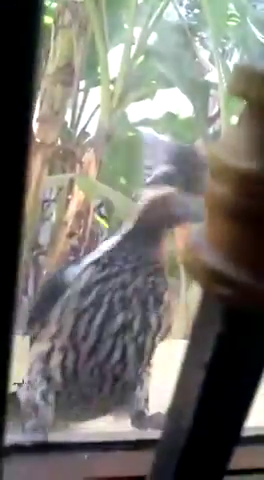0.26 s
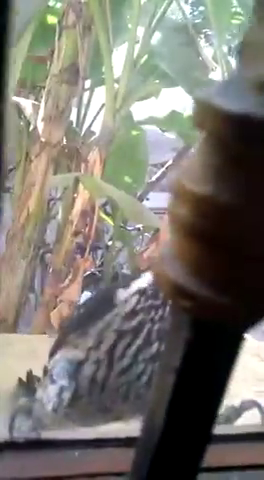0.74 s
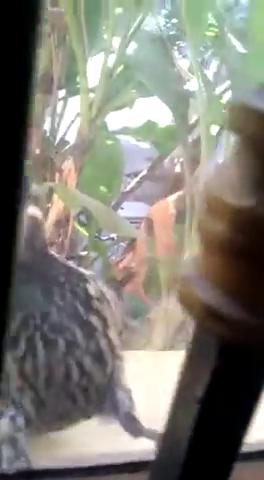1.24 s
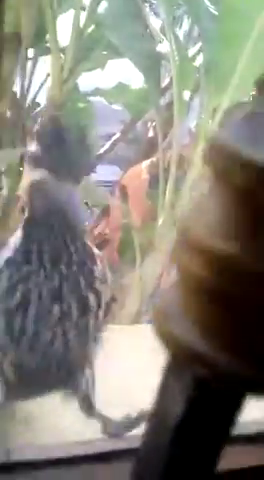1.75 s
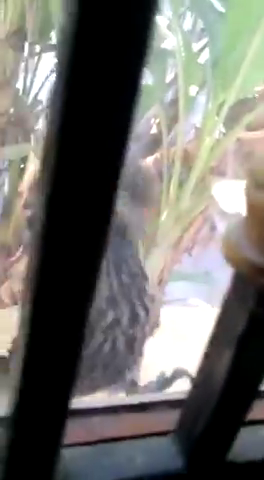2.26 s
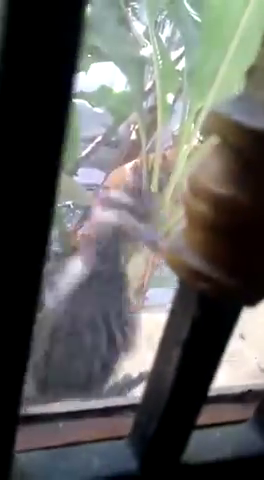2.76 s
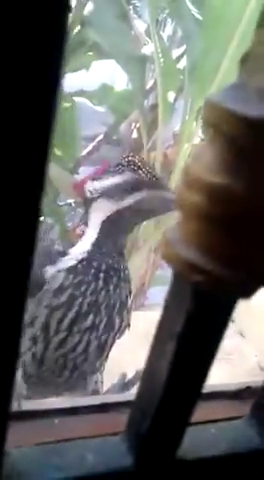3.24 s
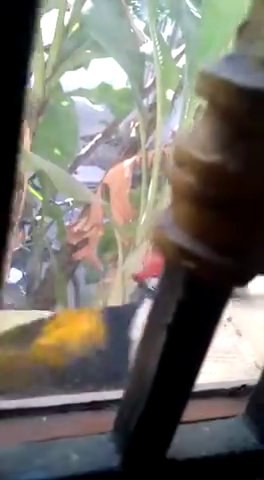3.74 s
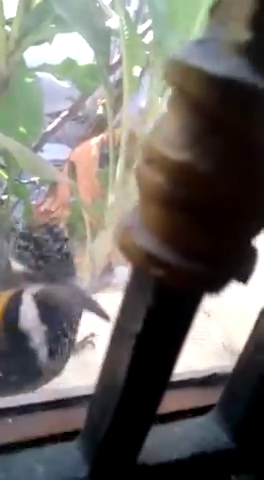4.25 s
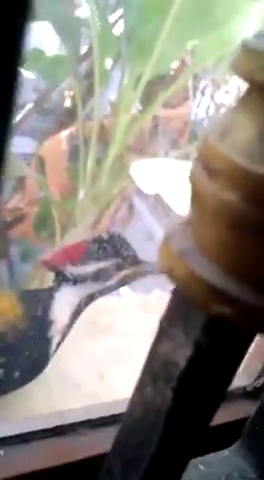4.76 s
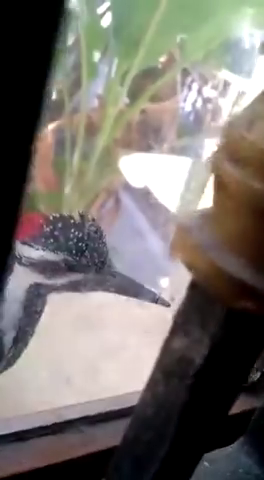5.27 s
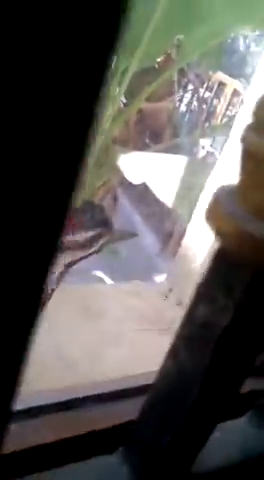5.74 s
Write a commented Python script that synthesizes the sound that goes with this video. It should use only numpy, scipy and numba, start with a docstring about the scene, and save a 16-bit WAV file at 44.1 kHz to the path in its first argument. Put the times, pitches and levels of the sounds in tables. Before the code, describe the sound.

Sharp hollow beak knocks strike a window over low steady air noise, with tiny scratches, soft handling bumps and one faint distant chirp.

```python
"""Woodpecker at the window

A woodpecker on the sill outside a closed window strikes the pane and frame: each blow is a push, a crack,
ringing tones and a noisy rattle. Its claws and feathers scrape in short grainy hisses.
Indoors a phone hears a dull rush of air, made of noise bands, and low bumps from its own handling. A far bird
gives one faint note. Strong blows clip, and the gain control ducks the rush, then lets it swell back.
"""
import sys
import numpy as np
from scipy import signal
from scipy.fft import rfft, irfft
from scipy.io import wavfile
from scipy.ndimage import uniform_filter1d
from numba import njit

SR = 44100
rng = np.random.default_rng(int(sys.argv[2]) if len(sys.argv) > 2 else 0)


def waveform_to_disk(signal):
    """Save audio, clipped to [-1, 1], as 16-bit WAV at the path in sys.argv[1]."""
    frames = np.transpose(np.atleast_2d(signal))
    scaled = np.clip(frames, -1, 1) * 32767
    samples = np.round(scaled).astype(np.int16)
    wavfile.write(sys.argv[1], SR, samples)


N = 264600  # samples, 6 s
HZ = np.arange(N // 2 + 1) * SR / N
TIME = np.arange(N) / SR


def undb(db):
    """Turn a level in dB into a plain gain."""
    return 10 ** (np.asarray(db) / 20)


def level(x, db):
    """Scale a sound to an rms (average) level in dB."""
    return x * undb(db) / np.sqrt(np.mean(x ** 2))


def colour(table):
    """Draw a gain for every frequency through (frequency [Hz], level [dB]) points."""
    hz, db = np.transpose(table)
    return undb(np.interp(np.log(HZ + 1), np.log(hz), db))


def band(hz, octaves, size=N):
    """Make noise in a bell-shaped band around one frequency, rms 1."""
    f = np.arange(size // 2 + 1) * SR / size
    bell = np.exp(-(np.log2((f + 1) / hz) / octaves) ** 2)
    noise = rfft(rng.standard_normal(size))
    return level(irfft(noise * bell, size), 0)


def walk(rate):
    """Wander at random: a new value `rate` times a second, smoothed twice; spread near 1."""
    k = int(SR / rate)
    steps = np.repeat(rng.standard_normal(N // k + 1), k)
    smooth = uniform_filter1d(uniform_filter1d(steps, k), k)
    return 1.14 * smooth[:N]


def add(out, s, sound):
    """Mix a sound in from second s."""
    i = int(s * SR)
    out[i:i + len(sound)] += sound[:N - i]


def fade(t, t60):
    """Die away by 60 dB in t60 seconds."""
    return np.exp(-np.log(1000) * t / t60)


# beak blows: (time [s], strength [dB], contact [ms], brightness [dB], push on the pane [dB])
BEAK_BLOWS = [(1.6126, -4.5, 1.07, 6, -1), (1.6282, -2.5, 0.88, 1, 5), (2.1293, -3.5, 0.92, 6, 1),
              (2.1488, 7, 1.4, 1.5, 4), (2.1734, -9, 0.97, 1, 0.5), (2.7618, 10, 1.38, 3.5, 4)]
# ringing tones of pane and frame: (frequency [Hz], relative level [dB], time to fall 60 dB [s])
WINDOW_MODES = [(189.4, -10.5, 0.35), (368, -6.5, 0.057), (432, -1.5, 0.073), (560, -6, 0.046),
                (703, -2.5, 0.013), (797, -15, 0.044), (922, -10.5, 0.03), (1100, -15.5, 0.034),
                (1310, -9, 0.01), (1620, -12, 0.023), (2810, -34, 0.11), (3480, -32, 0.032),
                (5720, -32, 0.038), (7500, -25, 0.022)]
# hard beak tip on glass, noise bands: (frequency [Hz], relative level [dB])
TIP_CRACK = [(3300, -28.5), (5700, -31), (7800, -34.5), (11000, -45)]
# rattle of the loose pane and the room's answer: (frequency [Hz], relative level [dB], time to fall 60 dB [s])
PANE_RATTLE = [(418, -23.5, 0.27), (950, -27, 0.21), (1790, -27, .15), (2840, -31.5, 0.24),
               (5430, -39.5, 0.38), (8100, -43, 0.29), (11500, -59, .14)]


def beak(ring_db=-3.0, spread_db=1.4, rise_ms=3.1, crack_t60=0.053, pane_hz=170, chatter_db=2.5):
    """Each blow pushes the pane, cracks, rings the window's own tones and sets off a rattle."""
    out, t = np.zeros(N), TIME[:SR // 2]
    for s, strength_db, contact_ms, bright_db, push_db in BEAK_BLOWS:
        push = np.sin(np.pi * np.clip(t * 1000 / contact_ms, 0, 1)) ** 2

        # every blow lands on another spot, so the balance of the tones shifts
        spot_db = spread_db * rng.standard_normal(len(WINDOW_MODES))
        ring = np.zeros(len(t))
        for (hz, db, t60), shift_db in zip(WINDOW_MODES, spot_db):
            # glancing, bright blows favour the tones from about 900 Hz up
            tilt_db = bright_db * np.clip(np.log2(hz / 650) * 2, -1, 1)
            ring += undb(db + shift_db + tilt_db) * np.sin(2 * np.pi * hz * t) * fade(t, t60)
        ring *= undb(ring_db) * (1 - np.exp(-t * 1000 / contact_ms))  # longer contact, slower build-up

        crack = sum(undb(db + bright_db) * band(hz, 0.46, size=len(t)) for hz, db in TIP_CRACK)
        crack = crack * fade(t, crack_t60)

        rattle = sum(undb(db) * band(hz, 0.57, size=len(t)) * fade(t, t60) for hz, db, t60 in PANE_RATTLE)
        chatter = undb(chatter_db * walk(224)[:len(t)])  # quick uneven flutter
        rattle = rattle * chatter * (1 - np.exp(-t * 1000 / rise_ms))

        add(out, s, undb(strength_db) * (crack + rattle - ring - undb(push_db) * push))
    # a small pane radiates little deep bass
    return signal.sosfilt(signal.butter(2, pane_hz, "high", fs=SR, output="sos"), out)


# claws and feathers on sill and glass: (time [s], level [dB], length [ms])
CLAW_SCRAPES = [(.541, -43, 16), (.565, -45, 16), (.8265, -39.5, 8), (.901, -42, 6), (.9164, -39, 6),
                (.942, -38, 3), (1.055, -43.5, 12), (1.092, -45, 10), (1.1134, -41, 8.8), (1.1274, -41, 6),
                (1.537, -39.5, 34), (1.5988, -41, 5), (1.656, -40, 14), (2.718, -46, 45), (3.648, -42, 4.5)]
# a flick this short or shorter hisses at FLICK_HZ; each doubling of length shifts the centre
FLICK_HZ, FLICK_MS, DRAG_OCTAVES = 10200, 6.5, -0.33


def claws(octaves=0.86, grain_db=1.8):
    """Grainy treble hisses start fast and fade over the length of the slip; long drags sound lower."""
    out, t = np.zeros(N), TIME[:SR // 8]
    for s, db, ms in CLAW_SCRAPES:
        hz = FLICK_HZ * max(ms / FLICK_MS, 1) ** DRAG_OCTAVES
        hiss = band(hz, octaves, size=len(t))
        # the level jumps every 40 samples, which gives the grain
        jumps = np.repeat(rng.standard_normal(len(t) // 40 + 1), 40)[:len(t)]
        shape = (1 - np.exp(-t / 0.00085)) * np.exp(-(t * 1000 / ms) ** 2)
        add(out, s, undb(db) * hiss * undb(grain_db * jumps) * shape)
    return out


# fingers shifting on the phone: (time [s], level [dB])
HAND_BUMPS = [(0.291, -21), (0.849, -36), (1.179, -26), (3.8, -21), (4.43, -28), (4.599, -30), (5.63, -24)]
BUMP_HZ, BUMP_CYCLES = 68, 2.5


def hand():
    """Soft low bumps through the phone's case: a few cycles of a deep tone that swell and fade."""
    out, t = np.zeros(N), TIME[:SR // 5]
    shape = np.sin(np.pi * np.clip(t * BUMP_HZ / BUMP_CYCLES, 0, 1)) ** 2
    bump = np.sin(2 * np.pi * BUMP_HZ * t) * shape
    for s, db in HAND_BUMPS:
        add(out, s, undb(db) * bump)
    return out


# tone colour of the rushing air: (frequency [Hz], relative level [dB])
AIR_COLOUR = [(40, -61.5), (90, -57.5), (170, -52), (250, -54.5), (310, -47), (450, -50), (700, -65),
              (1000, -65.5), (1270, -65), (1700, -69.5), (3000, -74), (5500, -88), (8000, -89),
              (11000, -97.5), (14000, -103.0)]
# how much of the air is unrelated left and right: (frequency [Hz], share [dB])
AIR_APART = [(30, -30), (60, -23), (300, -23), (2000, -38), (3000, -35), (5000, -8), (9000, -12),
             (13000, -17)]
# wavering low hums: (frequency [Hz], level [dB])
LOW_HUMS = [(95, -36.5), (148, -40.5), (200, -38)]
# slow swell of the air: (time [s], level [dB])
AIR_GUST = [(0, -0.5), (.9, 1.6), (1.5, -0.5), (4.3, 0), (6, -2)]
AIR_DB = -22.5  # rms level of the rush before the gust


def air(swell_db=-0.57, flicker_db=1.5, whine_hz=1255, whine_db=-45.5):
    """Half-octave steps of noise swell together and flicker alone, with wavering hums and a narrow whine."""
    swell = swell_db * walk(1.5)
    mid = np.zeros(N)
    for hz in 30 * 2 ** np.arange(0, 9.5, .5):
        # the far hiss on top flickers less than the roar below
        flicker = flicker_db * min(1, 1500 / hz) ** .5 * walk(8.3)
        mid += np.sqrt(hz) * band(hz, 0.4) * undb(swell + flicker)

    # extra noise, added on the left and subtracted on the right, widens the rush
    side = rfft(np.std(mid) * rng.standard_normal(N)) * colour(AIR_APART)
    both = irfft((rfft(mid) + np.array([side, -side])) * colour(AIR_COLOUR), N)

    hums = sum(level(band(hz, 0.059) * undb(3.5 * walk(2.92)), db) for hz, db in LOW_HUMS)
    whine = level(band(whine_hz, 0.041), whine_db)
    gust = undb(np.interp(TIME, *np.transpose(AIR_GUST)))
    return (level(both, AIR_DB) + hums + whine) * gust


CHIRP_S, CHIRP_HZ, CHIRP_MS, CHIRP_DB = 5.639, 3790, 45, -43  # middle of the note, pitch, length, level


def far_bird():
    """One faint thin note: a steady tone that swells and fades in a smooth bell shape."""
    shape = np.exp(-((TIME - CHIRP_S) * 2000 / CHIRP_MS) ** 2)
    return undb(CHIRP_DB) * shape * np.sin(2 * np.pi * CHIRP_HZ * TIME)


def scene():
    """All sounds together as they reach the phone, left and right."""
    return beak() + claws() + hand() + air() + far_bird()


@njit
def ride(x, start_db, top_db, slope, release_db, duck_s, swell_s):
    """Gain control that follows the loudest recent peak: it ducks fast and swells back slowly."""
    gain, held, g = np.empty(len(x)), top_db - start_db / slope, start_db
    for i in range(len(x)):
        # the remembered peak sinks by release_db each second
        held = max(held - release_db / SR, 20 * np.log10(x[i] + 1e-9))
        goal = min(0., slope * (top_db - held))
        g += (goal - g) / (SR * (duck_s if goal < g else swell_s))
        gain[i] = 10 ** (g / 20)
    return gain


# late inverted copy and bass of each microphone, left then right:
# (first notch [Hz], share of the copy [0-1], copy fades above [Hz], bass cut [Hz], bass lift [dB])
MIC_COMB = [(2374, .76, 6600, 90, 1.57), (2200, .78, 10000, 28, 0)]
# level of the left-right difference: (frequency [Hz], level [dB])
STEREO_WIDTH = [(60, 8.5), (650, -0.5), (900, -51), (3300, -16), (4000, -1.5), (10000, 3.5), (14000, -4)]
SHELF_HZ = 2000  # half of the bass lift, in dB, is left here
DIP_HZ, DIP_WIDTH_HZ, DIP_SHARE = 13200, 490, .6  # a dip in the microphones' top
TOP_HZ, CEILING = 14200, 0.97  # treble cut; clipping level (full scale is 1)


def record(dry):
    """Late inverted copies comb the microphones, mids go near mono, gain rides, peaks clip, the top is cut."""
    heard = []
    for x, (notch_hz, share, fade_hz, bass_hz, lift_db) in zip(dry, MIC_COMB):
        late = np.exp(-2j * np.pi * HZ / notch_hz)  # a delay of 1 / notch_hz seconds
        comb = 1 - share / (1 + (HZ / fade_hz) ** 2) * late
        lift = undb(lift_db / (1 + (HZ / SHELF_HZ) ** 2))
        bass_cut = 1j * HZ / (1j * HZ + bass_hz)
        heard.append(rfft(x) * comb * lift * bass_cut)
    left, right = heard

    mid = (left + right) / 2
    side = (left - right) / 2 * colour(STEREO_WIDTH)
    dip = 1 - DIP_SHARE * np.exp(-((HZ - DIP_HZ) / DIP_WIDTH_HZ) ** 2)
    sound = irfft([(mid + side) * dip, (mid - side) * dip], N)

    loudest = np.abs(sound).max(axis=0)  # both sides share one gain
    gain = ride(loudest, start_db=-8., top_db=-11.5, slope=0.65, release_db=24.0, duck_s=0.039, swell_s=0.53)
    clipped = np.clip(sound * gain, -CEILING, CEILING)
    return signal.sosfilt(signal.ellip(12, .3, 70, TOP_HZ, fs=SR, output="sos"), clipped)


dry = scene()
out = record(dry)
waveform_to_disk(out)
```